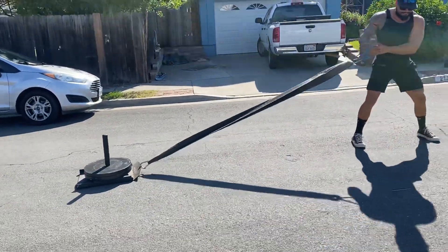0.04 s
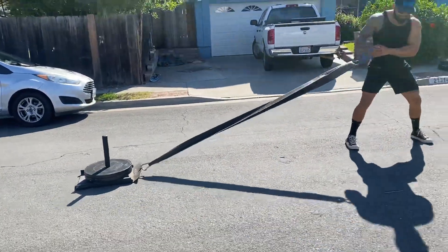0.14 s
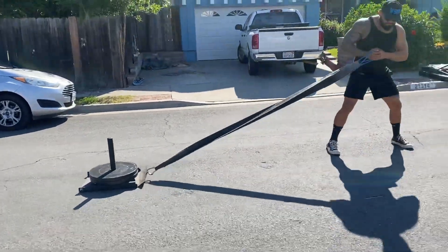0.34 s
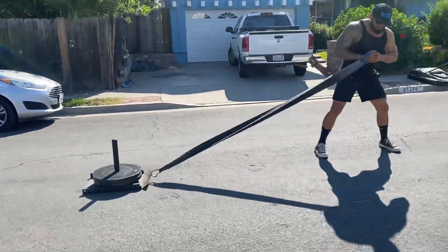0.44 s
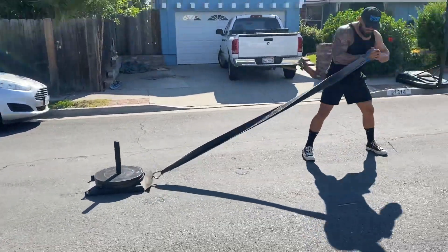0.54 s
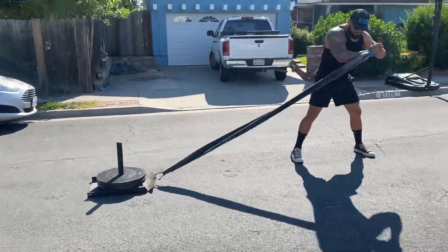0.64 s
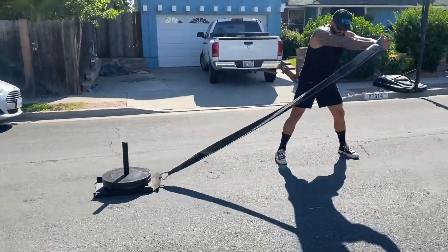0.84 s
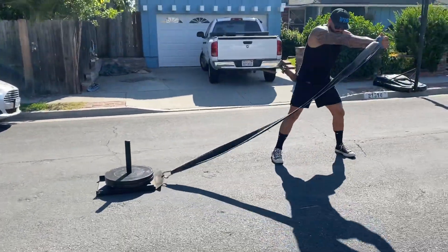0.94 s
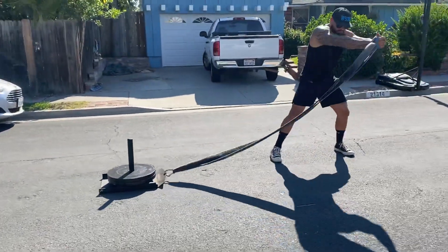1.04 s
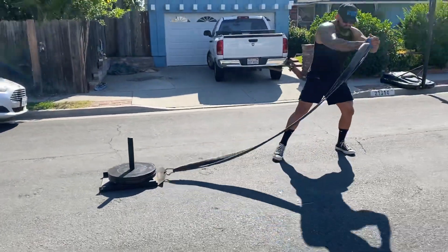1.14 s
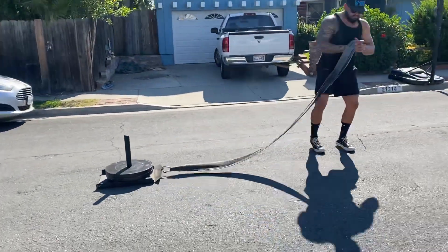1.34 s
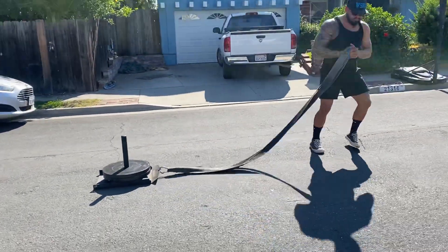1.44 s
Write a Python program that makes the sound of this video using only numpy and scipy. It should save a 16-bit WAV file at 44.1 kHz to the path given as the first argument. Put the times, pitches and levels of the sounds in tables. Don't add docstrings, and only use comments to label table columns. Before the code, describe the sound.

A steel sled with a loose weight plate scrapes over rough asphalt, swells into a heavy clank and thuds, then slows and stops, leaving faint traffic and light wind; outdoors, stereo handheld microphone.

```python
import sys
import numpy as np
from scipy import signal
from scipy.fft import rfft, irfft
from scipy.io import wavfile
from scipy.ndimage import uniform_filter1d

SR = 44100
rng = np.random.default_rng(int(sys.argv[2]) if len(sys.argv) > 2 else 0)


def to_wav(s):
    ch = np.atleast_2d(s).T
    pcm = np.round(np.clip(ch, -1, 1) * 32767)
    wavfile.write(sys.argv[1], SR, pcm.astype(np.int16))


def boost_factor(decibels):
    exponent = np.asarray(decibels, float) / 20
    return 10 ** exponent


N = 66150

# (time [s], scrape level [dB], frame ring [dB])
DRAG = [(0.0, -47.5, -8), (0.08, -43.5, 1.5), (0.22, -40.5, -1.5), (0.386, -37.5, -1), (0.404, -28.5, -25),
        (0.414, -36.5, 5), (0.594, -39, -3.5), (0.664, -38.5, -2), (0.684, -38.5, -30), (0.728, -36, 0.5),
        (0.752, -43.5, 5.5), (0.822, -41, 8), (0.88, -44, 3), (0.96, -50, 11.5), (1.066, -53.5, 7),
        (1.106, -65, -8), (1.2, -59, 7)]
# (frequency [Hz], density [dB per Hz])
GRIT_COLOUR = [(59, -32), (100, -2.5), (360, -7), (435, -15), (610, -4.5), (1500, -14.5), (2390, -10.5),
               (14000, -30), (15200, -45)]
# (frequency [Hz], width [Hz], level [dB])
FRAME_MODES = [(155, 60, -12), (229, 36, -4.5), (350, 15.2, 4.5), (592, 26, 1.5), (800, 16, 0),
               (871, 26, -1), (950, 21, 0.5), (1127, 100, -3.5), (1424, 44, -8), (2086, 63, -9.5),
               (2473, 32, -7.5), (2622, 53, -7.5), (2953, 92, -6.5), (3360, 170, -9)]
# (time [s], peak [dB], frequency [Hz], T60 [s])
BUMPS = [(.0, -40.5, 592, 0.26), (.08, -33, 216, 0.065), (.245, -33, 60.4, 0.081), (.338, -30.5, 616, 0.11),
         (.358, -28, 609, 0.11), (.373, -48, 600, .1), (.3995, -31, 2065, .04), (.401, -27, 2575, .03),
         (0.405, -25, 3350, 0.021), (0.4094, -19.5, 320, 0.044), (.419, -22, 327, .04),
         (.445, -26.5, 171, 0.06), (.47, -24.5, 243, 0.065), (.413, -27, 3360, 0.027),
         (0.417, -26, 3000, .04), (.422, -22.5, 1777, 0.028), (0.456, -29, 2900, 0.026),
         (.436, -23.5, 1960, 0.043), (0.439, -22.5, 950, 0.062), (.456, -41, 986, 0.043),
         (0.465, -24, 1140, 0.032), (.472, -30.5, 2050, .03), (0.482, -29, 1122, .05),
         (.500, -48, 1130, 0.027), (.497, -24, 350, 0.037), (.555, -30.5, 603, 0.13),
         (0.571, -32, 192, 0.033), (.582, -32, 640, 0.035), (0.629, -26, 155, .08), (0.7453, -20, 165, .04),
         (0.7673, -14.5, 140, 0.047), (0.789, -35, 70, 0.062), (.781, -30, 368, 0.12),
         (.797, -35.5, 368, 0.12), (.794, -28.5, 605, 0.056), (1.055, -43.5, 1390, 0.035),
         (1.079, -35, 170, .06), (1.216, -40.5, 950, 0.037), (1.216, -49, 2000, 0.022),
         (1.3383, -27.5, 595, 0.012), (1.341, -49.5, 4280, .015), (1.342, -37.5, 204, 0.035)]
# (frequency [Hz], density [dB per Hz])
TOWN_COLOUR = [(60, -60), (100, -1), (300, -4.5), (900, -7.5), (1700, -15), (3000, -31.5), (10000, -39),
               (15500, -42)]
# (time [s], level [dB])
GUSTS = [(0.0, -49.5), (0.232, -36.5), (0.266, -52), (0.304, -36.5), (0.324, -47), (0.376, -61),
         (0.446, -56), (0.554, -50), (0.588, -32), (0.622, -37), (0.68, -43.5), (0.792, -35), (0.83, -76),
         (0.844, -44), (1.082, -46.5), (1.136, -53), (1.148, -48.5), (1.5, -59)]
# (time [s], peak [dB], frequency [Hz], length [cycles])
BUFFETS = [
    (.3145, -28, 82, 2.8),
]
# (time [s], peak [dB], rattle length [s], brightness [dB], favoured mode [Hz])
CLANKS = [(0.022, -52, 0.013, -38, 566), (0.077, -36.5, 0.081, -3, 237), (0.2, -40, 0.064, -17, 950),
          (.31, -28.5, 0.014, -4, 350), (0.324, -29.5, 0.021, -1, 900), (0.3966, -20.5, 0.0063, -10, 590),
          (0.4002, -18.5, 0.0047, 6.5, 450), (0.4085, -18.5, 0.012, -12, 590),
          (.418, -30, 0.0019, -22, 350), (0.423, -22, 0.017, -38, 960), (0.437, -17, 0.0018, -15, 880),
          (0.461, -39, 0.016, -28, 814), (0.487, -22, 0.0048, -24, 390), (0.587, -23.5, 0.0065, -16, 350),
          (0.629, -28, 0.033, 0, 350), (0.697, -33, 0.018, -2, 810), (0.719, -31.5, 0.0088, 11, 1100),
          (0.789, -31, 0.024, -6, 350), (0.806, -35, 0.0038, -3.5, 1130), (.905, -42, 0.0096, -17, 404),
          (1.049, -37, 0.006, -25, 445), (1.196, -40, 0.0073, -13, 560), (1.218, -41, 0.0052, -20, 394),
          (1.335, -60, 0.0019, -22, 500)]
# (time [s], length [s], peak [dB], frequency [Hz])
BRUSHES = [(0.032, 0.061, -58, 4600), (0.281, 0.021, -45.5, 5600), (0.864, 0.026, -50, 12300),
           (0.724, .02, -70, 12500), (1.034, 0.062, -61, 2900), (1.116, 0.024, -69, 3020),
           (1.18, 0.065, -66.5, 7600), (1.437, 0.045, -69.5, 6600), (1.219, 0.01, -63.5, 2300),
           (1.4, 0.011, -63, 3450), (1.485, 0.071, -60.5, 1940)]
# (time [s], peak [dB])
BUCKLE_TICKS = [
    (1.339, -44),
    (1.340, -46),
    (1.5, -60),
]
# (time [s], peak [dB],
# frequency [Hz], length [cycles])
THUDS = [(.045, -39.5, 592, 6.5), (.407, -22, 603, 6.2), (.12, -39, 216, 2.1), (.4035, -17, 400, 0.88),
         (.4068, -11.5, 410, 0.74), (.4355, -11.5, 244, 0.69), (.462, -13, 243, 0.65),
         (.618, -20.5, 247, 0.72), (.649, -34.5, 157, 1.5), (.799, -26.5, 73, 0.79),
         (1.0563, -26, 199, 0.69), (1.0640, -35, 130, 0.63), (1.1530, -39.5, 127, 1),
         (1.1615, -36.5, 110, 0.25), (1.341, -53, 196, 0.2)]
# (frequency [Hz], lead [half turns])
PORT_LAG = [(0, 0), (1000, .26), (1400, .55), (1700, 1.5), (2500, 2.05), (3000, 2.35), (4000, 2.4),
            (4800, 3.2), (6400, 4), (8100, 3), (14000, 0), (16000, -1)]
# (frequency [Hz], difference [dB])
PORT_BALANCE = [(100, -1), (690, 1.5), (2350, 6), (4340, 5.5), (8000, -4.5)]
# (frequency [Hz], half width [Hz], gain
# [dB])
MID_GAPS = [(8300, 120, 3.5), (12150, 810, -11), (15500, 500, -30)]
SIDE_GAPS = [(6100, 400, -4), (9900, 420, -37), (13900, 560, -48), (16100, 300, -30)]

STOP_S, STOP_FADE_S = 1.085, 0.028
DULL_S, DULL_FADE_S, DULL_SHARE = 1, 0.038, 0.45
GRIT_DB, GRAINS_PER_S, GRAIN_SPREAD_DB = 2.5, 3500, 2
FRAME_DB, FAVOUR_DB_PER_OCTAVE = 2, -6
BUMP_SAG, BUMP_ATTACK_CYCLES = 0.11, 0.41
TOWN_DB, TOWN_SIDE_DB, TOWN_PATCH_DB = -49.5, -6.5, 2
HUM_HZ, HUM_WIDTH_HZ, HUM_DB = 94.4, 27, -56.5
WIND_HZ, WIND_SIDE_DB, WIND_LAG_DB = 82, -15, -6
BUFFET_GLIDE_HZ_PER_S = -500
RATTLE_DB, CRACK_DB = 15.5, -5
ECHO_DB, ECHO_T60_S, ECHO_DELAY_S = -6.5, 0.16, 0.012
LEFT_RIGHT = np.array([[1], [-1]])


def level(x, db):
    return x * boost_factor(db) / np.sqrt(np.mean(x ** 2))


def curve(table, col=1):
    table = np.array(table)
    return np.interp(np.arange(N) / SR, table[:, 0], table[:, col])


def over_hz(table):
    table = np.array(table)
    hz = np.arange(N // 2 + 1) * SR / N
    return np.interp(np.log(hz + 1), np.log(table[:, 0]), table[:, 1])


def colour(x, table):
    return irfft(rfft(x) * boost_factor(over_hz(table)), N)


def ring(x, hz, width_hz):
    return signal.lfilter(*signal.iirpeak(hz, hz / width_hz, fs=SR), x)


def walk(rate):
    hold = int(SR / rate)
    steps = np.repeat(rng.standard_normal(N // hold + 1), hold)
    return 0.93 * uniform_filter1d(uniform_filter1d(steps, hold), hold)[:N]


def grains(rate, spread_db):
    chance, sign, size = rng.random((3, N))
    return (chance < rate / SR) * np.sign(sign - 0.5) * boost_factor(-spread_db * np.log(size + 1e-9))


def frame(low, high, favour_hz=None):
    out = 0
    for k, (hz, width_hz, db) in enumerate(FRAME_MODES):
        lean_db = 0
        if favour_hz and hz < 1500:
            lean_db = FAVOUR_DB_PER_OCTAVE * abs(np.log2(hz / favour_hz))
        push = low if hz < 1500 else high
        out = out + (-1) ** k * boost_factor(db + lean_db) * ring(push, hz, width_hz)
    return out


def scrape():
    t = np.arange(N) / SR
    speed = boost_factor(curve(DRAG)) / (1 + np.exp((t - STOP_S) / STOP_FADE_S))
    stones = level(grains(GRAINS_PER_S, GRAIN_SPREAD_DB), 0)
    grit = level(colour(stones + 1.1 * rng.standard_normal(N), GRIT_COLOUR), GRIT_DB)
    grit = grit * boost_factor(2.9 * walk(29.45)) * speed
    treble = colour(grit, [(2500, -25), (5000, -1.5)])
    grit = grit - treble * DULL_SHARE / (1 + np.exp((DULL_S - t) / DULL_FADE_S))
    drive = level(grains(900, spread_db=2.5), 0) * speed
    drive = drive * boost_factor(curve(DRAG, col=2) + 5.4 * walk(18.14))
    return grit + frame(drive, drive) * boost_factor(FRAME_DB + 13.0)


def bumps():
    out = 0
    for s, db, hz, t60 in BUMPS:
        t = np.clip(np.arange(N) / SR - s, 0, None)
        sag = BUMP_SAG * min(150 / hz, 1) ** 2 * np.minimum(t / t60, 1)
        attack = 1 - np.exp(-t * hz / BUMP_ATTACK_CYCLES)
        out = out + boost_factor(db - 60 * t / t60) * attack * np.sin(2 * np.pi * hz * t * (1 - sag))
    return out


def town():
    def bed():
        return level(colour(rng.standard_normal(N), TOWN_COLOUR), TOWN_DB) * boost_factor(0.46 * walk(6.3))

    mid, side = bed(), bed()
    hum = ring(ring(rng.standard_normal(N), HUM_HZ, HUM_WIDTH_HZ), HUM_HZ, 36.0)
    out = mid + level(hum, HUM_DB)
    for hz in (500, 900, 1560, 2820):
        out = out + ring(mid, hz, hz / 2) * (boost_factor(TOWN_PATCH_DB * walk(13.57)) - 1)
    return out + boost_factor(TOWN_SIDE_DB) * colour(side, [(150, -9.5), (1500, 7)]) * LEFT_RIGHT


def wind():
    shape = [(25, -30), (45, -6), (WIND_HZ, 0), (130, -5), (250, -20), (600, -45)]
    mid, side = (level(colour(rng.standard_normal(N), shape), 0) for _ in range(2))
    gust = boost_factor(curve(GUSTS))
    common = mid * gust + thuds(BUFFETS, BUFFET_GLIDE_HZ_PER_S)
    across = np.imag(signal.hilbert(common))
    return common + (side * gust * boost_factor(WIND_SIDE_DB) + boost_factor(WIND_LAG_DB) * across) * LEFT_RIGHT


def clanks():
    t = np.arange(SR // 5) / SR
    out, crack = np.zeros(N + SR), np.zeros(N + SR)
    for s, db, length, bright_db, hz in CLANKS:
        rattle = rng.standard_normal(len(t))
        push = boost_factor(db) * rattle * np.exp(-t / length) * (1 - np.exp(-t / 0.00027))
        blow = boost_factor(db + 9.0) * np.exp(-t * 3000)
        bright = push * boost_factor(bright_db)
        i = int(s * SR)
        out[i:i + len(t)] += frame(push + blow, bright, hz)
        crack[i:i + len(t)] += bright
    thin = colour(crack[:N], [(500, 2), (1700, 3), (4000, -26), (15000, -34)])
    return boost_factor(RATTLE_DB) * out[:N] + boost_factor(CRACK_DB) * thin


def brushes():
    t, hiss = np.arange(N) / SR, rng.standard_normal(N)
    soft, ticks = 0, 0
    for s, length, db, hz in BRUSHES:
        swell = boost_factor(db) * np.exp(-((t - s) / length) ** 2)
        soft = soft + swell * level(ring(hiss, hz, hz / 2.4), 0)
    for s, db in BUCKLE_TICKS:
        ticks = ticks + boost_factor(db) * (t > s) * np.exp(-np.abs(t - s) / 0.0029)
    dry_colour = [(300, 1), (600, -4), (1000, 16.0), (3200, -7.5), (4500, -5.0), (6500, -14),
                  (9800, -6.5), (15000, -14)]
    return soft * boost_factor(2.0 * walk(40.5)) + colour(ticks * rng.standard_normal(N), dry_colour)


def thuds(table, glide_hz=0):
    out = 0
    for s, db, hz, cycles in table:
        t = np.arange(N) / SR - s
        swell = np.exp(-(t * hz / cycles) ** 2)
        out = out - boost_factor(db) * np.cos(2 * np.pi * (hz + glide_hz * t / 2) * t) * swell
    return out


def echoes(x):
    t = np.arange(SR // 4) / SR
    tail = rng.standard_normal((2, len(t))) * boost_factor(-60 * t / ECHO_T60_S) * (t > ECHO_DELAY_S)
    tail = level(tail, ECHO_DB) / np.sqrt(len(t))
    coloured = colour(x, [(300, -3.5), (700, -17.0), (1500, 4.0), (3000, -13), (5000, 10.5), (9000, -32.0)])
    return signal.fftconvolve(coloured[None], tail, axes=1)[:, :N]


def ports(x):
    hz, lag = np.arange(N // 2 + 1) * SR / N, np.array(PORT_LAG)
    turn = np.exp(0.5j * np.pi * np.interp(hz, lag[:, 0], lag[:, 1]))
    tilt = boost_factor(over_hz(PORT_BALANCE) / 2) * turn
    return np.array([irfft(rfft(x) * tilt, N), irfft(rfft(x) / tilt, N)])


def gaps(x, table):
    hz = np.arange(N // 2 + 1) * SR / N
    gain_db = sum(db * np.exp(-((hz - centre_hz) / half_hz) ** 4) for centre_hz, half_hz, db in table)
    return irfft(rfft(x) * boost_factor(gain_db), N)


def scene():
    sled = scrape() + bumps() + clanks() + brushes() + thuds(THUDS)
    return ports(sled) + echoes(sled) + wind() + town()


def top_cut(x):
    return signal.sosfilt(signal.butter(12, 15300, fs=SR, output="sos"), x)


def record(dry):
    mid = gaps((dry[0] + dry[1]) / 2, MID_GAPS)
    side = gaps((dry[0] - dry[1]) / 2, SIDE_GAPS)
    return top_cut(np.array([mid + side, mid - side]))


dry = scene()
out = record(dry)
to_wav(out)
```